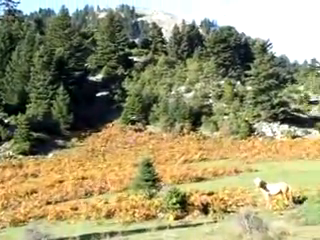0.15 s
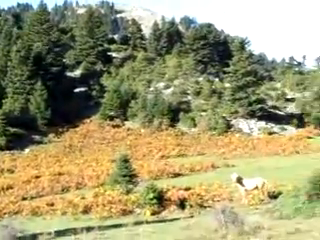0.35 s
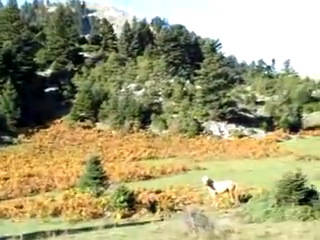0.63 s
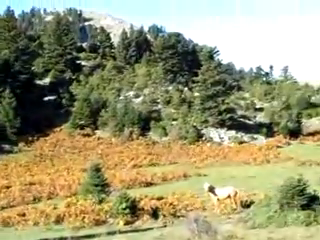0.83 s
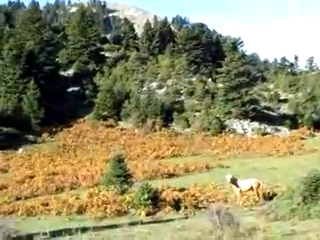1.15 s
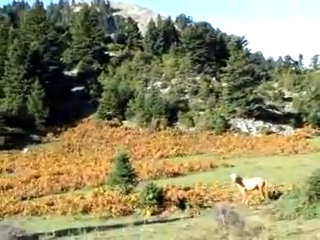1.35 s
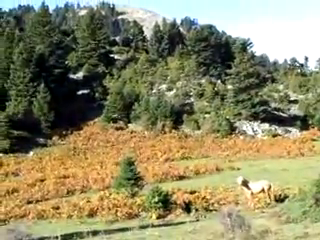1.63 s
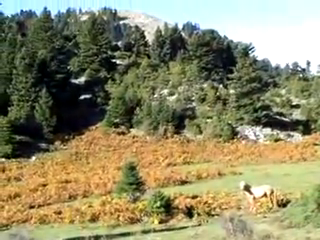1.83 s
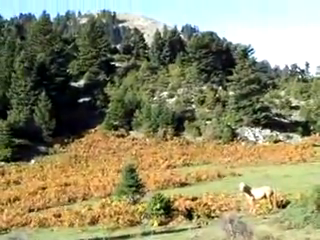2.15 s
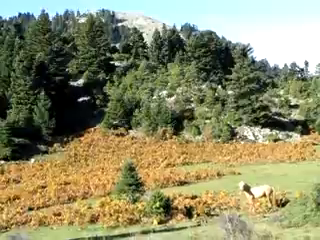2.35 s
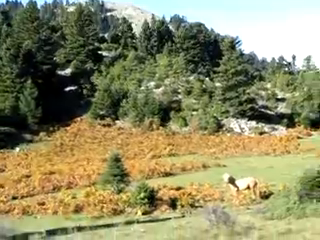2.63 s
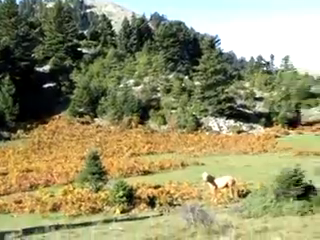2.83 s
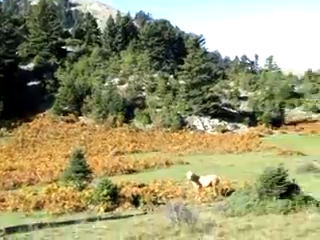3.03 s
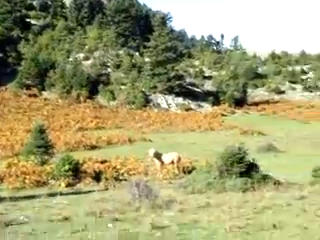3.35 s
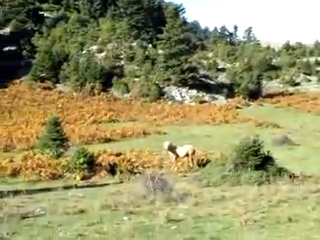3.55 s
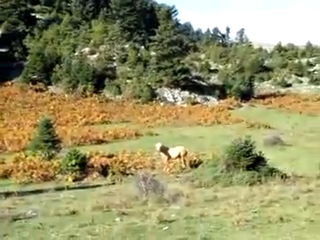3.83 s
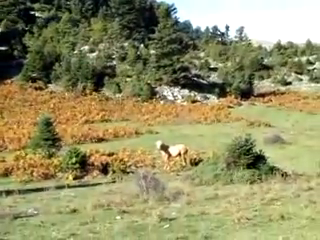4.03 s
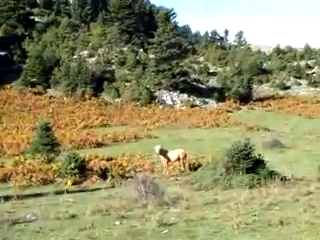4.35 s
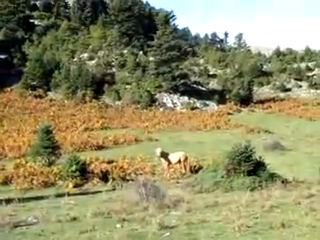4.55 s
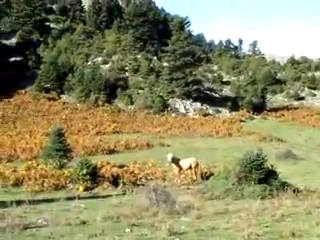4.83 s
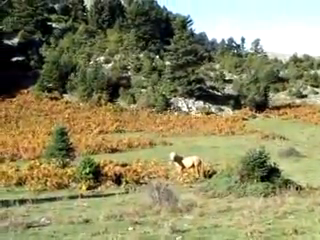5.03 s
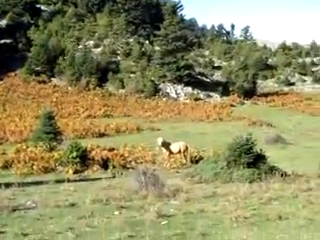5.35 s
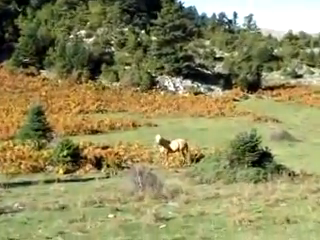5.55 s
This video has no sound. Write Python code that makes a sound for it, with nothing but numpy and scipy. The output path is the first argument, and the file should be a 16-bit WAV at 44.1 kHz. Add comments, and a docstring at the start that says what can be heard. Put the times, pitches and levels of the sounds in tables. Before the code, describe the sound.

In an open mountain pasture, a horse squeals briefly, then gives a long breaking whinny, and another call starts amid bell clanks, hoof knocks and wind.

```python
"""Horses call across a mountain pasture: a short squeal, a long whinny with repeated breaks, then a third call.
Each voice is a high whistle plus a lower fold tone, with rasp from throat resonances as it roughens.
A livestock bell clanks in damped modes, hooves knock, dry stalks snap, a small bird chirps in falling sines.
The wooded slope echoes as decaying noise; far bells ring, wind rumbles on two microphone ports, and
distant trees and air hiss as shaped noise."""
import sys
import numpy as np
from scipy import signal
from scipy.fft import rfft, irfft, next_fast_len
from scipy.io import wavfile
from scipy.ndimage import uniform_filter1d

SR = 44100
rng = np.random.default_rng(int(sys.argv[2]) if len(sys.argv) > 2 else 0)


def put_to_file(sound):
    """Save the sound as 16-bit audio at rate SR, in the file named by the first command-line argument."""
    columns = np.atleast_2d(sound).T  # one column per channel
    safe = np.clip(columns, -1, 1)
    whole_steps = np.round(safe * 32767)
    wavfile.write(sys.argv[1], SR, whole_steps.astype(np.int16))


N = 250929
T = np.arange(N) / SR
FFT_SIZE = next_fast_len(N, real=True)


def undb(db):
    """Decibels to gain."""
    return 10 ** (np.asarray(db) / 20)


def unit(x):
    """Scale to rms 1."""
    return x / np.sqrt(np.mean(x ** 2) + 1e-18)


def steady(x):
    """Divide by the running rms over 25 ms."""
    return x / np.sqrt(np.abs(uniform_filter1d(x ** 2, size=1100)) + 1e-12)


def curves(table, t=T):
    """Columns of a table, joined by straight lines in time."""
    s, *columns = np.transpose(table)
    return [np.interp(t, s, c) for c in columns]


def over_bins(points):
    """(Hz, value) points interpolated over the FFT bins on a log axis."""
    hz, value = np.transpose(points)
    bin_hz = np.arange(FFT_SIZE // 2 + 1) * SR / FFT_SIZE
    return np.interp(np.log(bin_hz + 1), np.log(hz + 1), value)


def shape(x, response):
    """Filter by a frequency response."""
    return irfft(rfft(x, FFT_SIZE) * response, FFT_SIZE)[..., :N]


def noise(colour):
    """Noise of rms 1 with a given spectrum."""
    return unit(shape(rng.standard_normal(N), undb(over_bins(colour))))


def resonate(x, hz, width_hz):
    """Two-pole resonance with gain 1 at its centre."""
    return signal.lfilter(*signal.iirpeak(hz, hz / width_hz, fs=SR), x)


def steep(x, hz, width_hz):
    """A resonance applied twice."""
    return resonate(resonate(x, hz, width_hz), hz, width_hz)


def band(hz, width_hz, t):
    """Noise in a steep resonance, rms 1."""
    return unit(steep(rng.standard_normal(len(t)), hz, width_hz))


def walk(cutoff_hz, t=T):
    """Random drift: low-passed noise, rms 1."""
    return unit(signal.lfilter(*signal.butter(2, cutoff_hz, fs=SR), rng.standard_normal(len(t))))


def cycle(hz):
    """Phase of an oscillator that follows a pitch curve."""
    return 2 * np.pi * np.cumsum(hz) / SR


def bump(s, rise_s, fall_s):
    """Gaussian hump of height 1 at time s; rise and fall are its 1/e times."""
    return np.exp(-np.minimum(((T - s) / np.where(T < s, rise_s, fall_s)) ** 2, 50))


def add(out, s, sound, pan_db=0):
    """Mix a short sound in at time s; pan is left minus right."""
    i = int(s * SR)
    out[:, i:i + len(sound)] += undb([[pan_db / 2], [-pan_db / 2]]) * sound[:N - i]


def horse(call, jitter, rough_jitter, doubling, rasp_db, fold_db, sideband_db, buzz_db, turbulence_db):
    """Whistle and lower fold tone intermodulate; as the voice breaks, the whistle scatters into rasp."""
    # throat resonances: f/Hz, width of each of two passes/Hz, relative level/dB
    throat = [(700, 490, -13.5), (1292, 410, -7.5), (1473, 78, -2), (1694, 220, -1.5), (2084, 530, -7.5)]
    nose_hz, nose_width_hz = 3194, 640
    flap_hz, flap_scatter, flap_depth_db = 85.4, 0.2, 5.5  # depth before levelling, at full roughness

    on, *controls = call
    span = (T >= np.floor(T[on][0])) & (T < np.ceil(T[on][-1]))
    t, out = T[span], np.zeros(N)
    hz, level_db, overtone_db, rough, fold_hz, strength_db = (c[span] for c in controls)
    rough, strength = np.clip(rough, 0, 1), undb(strength_db)

    stumble = .035 * rough * walk(35, t)
    high = cycle(hz * (1 + stumble + (jitter + rough_jitter * rough) * walk(178.0, t)))
    low = cycle(fold_hz * (1 + .05 * walk(110, t) / np.sqrt(1 + 6 * strength ** 2)))
    whistle_gain = np.sqrt(np.maximum(1 - 0.84 * rough, 0))
    whistle = whistle_gain * np.sin(high) * undb(2.3 * np.sqrt(rough) * walk(93, t))
    # strained folds beat strong-weak: side tones half a fold pitch from the whistle
    whistle = whistle * (1 + doubling * rough * np.sin(low / 2 + 2 * walk(40, t)))

    # folds chop the whistle: sum and difference tones in the upper throat resonance
    side_tones = np.sin(high + low) + undb(-7.5 + 4.5 * walk(30, t)) * np.sin(2 * high - low)
    chop = undb(sideband_db + 2.96 * walk(49, t)) * resonate(side_tones, hz=2360, width_hz=1100)
    fold_octave = undb(4.5) * strength ** 4 * np.sin(2 * low)  # grows when pressed hard
    folds = strength * (undb(fold_db) * strength * np.sin(low) + chop) + fold_octave

    # slack tissue flaps unevenly and lets the air through in puffs
    flap_phase = cycle(flap_hz * (1 + flap_scatter * walk(57, t)))
    flap = steady(undb(flap_depth_db * rough * np.sin(flap_phase)))
    rasp = steady(sum(undb(db) * band(f, w, t) for f, w, db in throat))

    # the nose picks out the whistle's octave, fold buzz and turbulence near its resonance
    buzz = np.sin(2 * high - low) + np.sin(high + 2 * low) + np.sin(5 * low)
    buzz = buzz + np.sin(high + 3 * low) * undb(4 * walk(25, t)) / 2
    turbulence = undb(turbulence_db) * rough * band(nose_hz, 1300, t)
    drive = np.sin(2 * high) + undb(buzz_db) * strength * buzz + turbulence
    nose = resonate(steady(steep(drive, nose_hz, nose_width_hz)), nose_hz, nose_width_hz)
    nose = 1.03 * nose * undb((3.0 + 2.0 * rough) * walk(44, t))

    voice = np.sqrt(2) * (whistle + folds) + undb(rasp_db) * rough ** 0.68 * rasp + undb(overtone_db) * nose
    sounding = uniform_filter1d(1. * on[span], size=300)  # 7 ms edges
    out[span] = voice * flap * undb(level_db) * sounding
    return out


def squealing(fold_hz):
    """Controls of a squeal: one whistle that swoops up and down over a fold tone of constant mean pitch."""
    # course: t/s, whistle f/Hz before smoothing, level/dB, nasal overtone/dB, roughness/0-1, fold strength/dB
    course = [(2.225, 1667, -51.5, 0, .15, -31), (2.243, 1628, -29, -1.5, 0.26, -19),
              (2.258, 1626, -29, -2.5, 0.03, -21), (2.272, 1673, -36, -0.5, 0.23, -22),
              (2.279, 1924, -32.5, -21, 0.03, -5), (2.298, 1955, -28.5, -21, 0, -21),
              (2.308, 1621, -34.5, 1.5, 0.32, -12), (2.322, 1595, -31, 0.5, 0.28, -7.5),
              (2.333, 1712, -41, -1, 0.32, -14.5), (2.346, 1870, -44, -4, 0.3, -9),
              (2.353, 2002, -31, -9, 0, -12), (2.368, 1692, -41.5, -11, 0.83, -11),
              (2.386, 1223, -29, -15, 0.01, -9), (2.394, 1395, -48, -7.5, 0.32, -24),
              (2.406, 1582, -34.5, -3, 0.1, -12), (2.422, 1668, -31.5, 14.5, 0, -18),
              (2.438, 1470, -28.5, -3, .1, -5), (2.448, 1300, -30, 6, .18, -9.5),
              (2.461, 1340, -43, 7, 0.2, -22)]
    hz, level_db, overtone_db, rough, strength_db = curves(course)
    on = (T > course[0][0]) & (T < course[-1][0])
    return on, uniform_filter1d(hz, size=260), level_db, overtone_db, rough, np.full(N, fold_hz), strength_db


def holding(course, scoop, fold_pitch, shimmer_db):
    """Controls of a long call: scoop up to a held note; at each catch pitch drops, voice breaks, folds sound."""
    # catches: t/s, pitch drop/share, fall/s, recovery/s, added roughness/0-1, level change/dB
    catches = [(3.214, 0.0037, 0.045, 0.099, 0.15, -9), (3.564, 0.033, 0.027, 0.035, 0.07, -1),
               (3.687, 0.11, 0.011, .07, 0.48, -13), (3.981, 0.061, 0.028, 0.026, 0.14, -2.5),
               (4.104, 0.15, 0.03, 0.041, 0.22, -2), (4.235, 0.28, 0.025, .04, 0.54, -8),
               (4.345, .13, 0.02066, 0.0357, 0.05, 1.5), (4.409, 0.0983, .012, .012, 0.31, 0.5),
               (4.457, 0.092, 0.011, 0.015, 0.1, 3), (5.59, 0.02, 0.02, 0.018, 0.3, -10)]
    scoop_s, onset_db, onset_s = .027, -26, 0.011
    break_lead_s, break_s = 0.01017, 0.015  # the break precedes the pitch minimum
    dip_s, snap_back_s = 0.012, 0.018
    fold_lead_s, fold_s, fold_lift_db = 0.013, 0.018, 8.5

    held_hz, level_db, overtone_db, rough, strength_db = curves(course)
    age = np.maximum(T - course[0][0], 0)
    hz = held_hz * (1 - scoop * np.exp(-age / scoop_s))
    level_db = level_db + onset_db * np.exp(-age / onset_s) + shimmer_db * walk(30)
    strain = 0
    for s, drop, fall_s, recovery_s, added_rough, change_db in catches:
        hz = hz * (1 - drop * bump(s, fall_s, recovery_s))
        rough = rough + added_rough * bump(s - break_lead_s, break_s, break_s)
        level_db = level_db + change_db * bump(s - break_lead_s, dip_s, snap_back_s)
        strain = strain + bump(s - fold_lead_s, fold_s, fold_s)
    on = (age > 0) & (T < course[-1][0] + .01)
    return on, hz, level_db, overtone_db, rough, curves(fold_pitch)[0], strength_db + fold_lift_db * strain


def cracks(jitter):
    """The voice flips into a higher register for an instant and tumbles back in a rough squeak."""
    # flips: t/s, length/s, level/dB, start f/Hz, end f/Hz
    flips = [(3.661, .02, -36, 3130, 2500), (3.666, 0.012, -28.5, 2400, 1760),
             (4.079, 0.027, -27.5, 2214, 1880), (4.241, .013, -21, 1740, 1600)]
    out = np.zeros((2, N))
    for s, length_s, db, start_hz, end_hz in flips:
        u = np.linspace(0, 1, int(length_s * SR))
        hz = (start_hz + (end_hz - start_hz) * u ** 2) * (1 + jitter * walk(400)[:len(u)])
        add(out, s, undb(db) * np.sin(np.pi * u) * np.sin(cycle(hz)))
    return out


def bell():
    """Dull sheet-metal bell: damped sine modes, weighted by which wall the clapper strikes."""
    # modes: f/Hz, t60/s, relative level struck on front wall/dB, on back wall/dB
    modes = [(635, .11, 0, -1), (664, .22, -8, -7), (1809, .12, -33, -12), (2385, 1.6, -29, -17),
             (2750, .2, -15, -30), (3957, .18, -26, -17), (4064, .18, -9, -25)]
    # clapper blows: t/s, level/dB, wall/0 front - 1 back
    blows = [(1.738, -29, 0.2), (1.916, -21.5, 0.059), (2.133, -29, 0.66), (2.996, -19, 1),
             (3.193, -19.5, 0.6)]
    out, t = np.zeros((2, N)), T[:SR]
    for s, db, wall in blows:
        ring = 0
        for hz, t60, front_db, back_db in modes:
            mode_db = front_db + wall * (back_db - front_db)
            ring = ring + undb(mode_db - 60 * t / t60) * np.sin(2 * np.pi * hz * t)
        add(out, s, undb(db) * ring * (1 - np.exp(-t / 0.0049)))
    return out


def ports(x):
    """Sound from the side reaches the left port first; the housing shades the right one near 3 kHz."""
    # port level difference: f/Hz, left minus right/dB
    balance = [(600, -1.5), (1100, -1), (1700, -1), (1950, -5.5), (2220, -6), (2400, 1), (2700, 3.5),
               (3300, 12.5), (4100, 10), (6000, 1.5)]
    # port phase difference: f/Hz, lead of left/rad
    lead = [(100, .1), (640, 0.31), (1250, 0.46), (1700, 0.88), (1900, 1.1), (2400, 2.66), (2820, 3.35),
            (4000, 4.8)]
    half = undb(over_bins(balance) / 2)
    left, right = np.array([half, 1 / half]) / np.sqrt((half ** 2 + half ** -2) / 2)
    return shape(x, np.array([left, right * np.exp(-1j * over_bins(lead))]))


def hooves(grit_db, turf_hz):
    """Hollow knock of two damped sines with a short crunch of soil noise, muffled by the turf."""
    # knocks: t/s, level before the turf filter/dB, f/Hz, t60/s
    knocks = [(.397, -26, 730, 0.015), (2.636, -34, 639, 0.039), (4.655, -26, 740, 0.025),
              (4.738, -22.5, 1115, 0.017), (5.316, -19, 702, 0.04), (5.341, -20, 683, 0.028),
              (5.399, -23.5, 710, 0.066), (5.4195, -10, 800, 0.017), (5.425, -16, 690, 0.018),
              (5.472, -22.5, 285.4, 0.013), (5.482, -17, 574, 0.0064), (5.484, -47, 92, 0.25)]
    out, t = np.zeros((2, N)), T[:SR // 5]
    for s, db, hz, t60 in knocks:
        overtone = undb(-7.0 - 60 * t / t60) * np.sin(2 * np.pi * 1.1 * hz * t)
        knock = np.sin(2 * np.pi * hz * t) + overtone
        soil = band(920, 560, t)
        hit = undb(db - 60 * t / t60) * (knock + undb(grit_db) * soil)
        add(out, s, hit * (1 - np.exp(-t / 0.00058)), pan_db=-4.5)
    return signal.sosfilt(signal.butter(2, [70, turf_hz], "band", fs=SR, output="sos"), out)


def snaps(t60):
    """Dry stalks crack: resonant noise that dies within milliseconds."""
    # stalks: t/s, relative level/dB, f/Hz, left minus right/dB
    stalks = [(2.128, -21, 1990, 20.5), (3.185, -11, 8000, -9.5), (4.217, -25, 8000, -1),
              (4.738, -22, 3040, -11), (4.809, -29.5, 7700, -6), (4.815, -24, 5300, -13),
              (5.316, -10.5, 2750, 5.5)]
    out, t = np.zeros((2, N)), T[:SR // 20]
    for s, db, hz, pan_db in stalks:
        crack = unit(resonate(rng.standard_normal(len(t)), hz, 0.13 * hz))
        add(out, s, undb(db - 60 * t / t60) * crack / 2, pan_db)
    return out


def bird(length_s):
    """Quick whistles: sines that fall exponentially in pitch under a half-sine envelope."""
    # chirps: t/s, level/dB, start f/Hz, end f/Hz
    chirps = [(0.123, -45.5, 3370, 2520), (.748, -47.5, 3440, 2430), (4.604, -48, 3310, 2790),
              (4.956, -48, 3310, 2370)]
    out, u = np.zeros((2, N)), np.linspace(0, 1, int(length_s * SR))
    for s, db, start_hz, end_hz in chirps:
        phase = cycle(start_hz * (end_hz / start_hz) ** u)
        add(out, s, undb(db) * np.sin(np.pi * u) * np.sin(phase))
    return out


def slope(x, t60, forest_db, dull_hz):
    """Quick scatter from the ground nearby plus a thin dull echo from the trees: decaying low-passed noise."""
    ground_db = -25
    t, out = T[:SR], []
    for channel in x:
        dull = signal.butter(4, dull_hz, fs=SR, output="sos")
        scatter = signal.sosfilt(dull, rng.standard_normal(SR))
        ground = unit(scatter * undb(-60 * t / 0.088) * (t > .003))
        forest = unit(scatter * undb(-60 * t / t60) * (1 - np.exp(-t / 0.0011)))
        echo = (undb(ground_db) * ground + undb(forest_db) * forest) / np.sqrt(SR)
        out.append(signal.fftconvolve(channel, echo)[:N])
    return np.array(out)


def far_bells():
    """Small bells further off in the herd: one damped sine each, at most 2 s long."""
    # strokes: t/s, level/dB, f/Hz, t60/s
    strokes = [(1.327, -54, 2790, 8.8), (5.039, -53.5, 4410, 1.2)]
    out, t = np.zeros((2, N)), T[:2 * SR]
    for s, db, hz, t60 in strokes:
        add(out, s, undb(db - 60 * t / t60) * np.sin(2 * np.pi * hz * t) * (1 - np.exp(-t / 0.0034)))
    return out


def wind(rumble_db, flutter_db):
    """Gusts over a light breeze rumble on each port independently; single eddies add brief damped swings."""
    # rumble spectrum: f/Hz, relative level/dB
    colour = [(12, -24), (20, 2), (43, 5), (68, 4), (103, -6.5), (221, -27), (260, -41.5), (340, -92),
              (570, -120)]
    # gusts: t/s, level before rumble_db/dB, 1/e half length/s, left minus right/dB
    gusts = [(0.446, -54, 0.045, -5), (0.954, -49, 0.12, 8.5), (1.12, -60, 0.059, 15),
             (1.42, -45, 0.35, 10), (1.925, -40, 0.17, -0.5), (2.274, -41, 0.27, 12),
             (2.644, -34.5, 0.11, 13), (3.088, -50.5, 0.32, -19.5)]
    # eddies: t/s, level/dB, f/Hz, port/0 left - 1 right
    eddies = [(0.94, -33, 67, 1), (1.324, -26, 82.5, 0), (1.953, -21, 115, 1), (2.276, -21, 59.6, 0),
              (2.464, -17.5, 79.1, 1), (2.635, -20, 65.5, 0), (2.974, -22.5, 77, 1), (3.133, -33, 75, 1)]
    force = undb(-61.5)  # breeze between gusts, before rumble_db
    for s, db, half_s, pan_db in gusts:
        force = force + undb([[db + pan_db / 2], [db - pan_db / 2]]) * bump(s, half_s, half_s)
    out = np.array([noise(colour) * port * undb(rumble_db + flutter_db * walk(33.0)) for port in force])
    for s, db, hz, port in eddies:
        cycles = (T - s) * hz
        out[int(round(port))] += undb(db) * np.sin(2 * np.pi * cycles) * np.exp(-np.abs(cycles) / 0.41)
    return out


def air():
    """Far trees and open air: shaped noise whose likeness between ports varies with frequency."""
    # spectrum: f/Hz, relative level/dB
    spectrum = [(40, -19.5), (130, -6.5), (220, -7), (400, -2.5), (520, -8.5), (720, 1.5), (900, -3),
                (1060, -0.5), (1450, -9), (3000, -11.5), (5000, -12.5), (7200, -18.5), (8400, -20),
                (10800, -32)]
    # course: t/s, level before a slow random sway/dB
    course = [(0, -48.5), (2.2, -47.5), (2.8, -45), (4.4, -45.5), (4.8, -44), (5.68, -45)]
    # f/Hz, correlation between ports
    likeness = over_bins([(150, 0.27), (600, 0.63), (1200, 0.072), (2500, 0.1), (5000, 0.068), (8000, 0.39)])
    mid = shape(noise(spectrum), np.sqrt((1 + likeness) / 2))
    side = shape(noise(spectrum), np.sqrt((1 - likeness) / 2))
    sway_db = .5 * walk(3)
    return np.array([mid + side, mid - side]) * undb(curves(course)[0] + sway_db)


def scene():
    """Three calls and the small sounds of the pasture under one hillside echo, with far bells, wind and air."""
    # long calls, before scoop and catches:
    # t/s, whistle f/Hz, level/dB, nasal overtone/dB, roughness/0-1, fold strength/dB
    whinny_course = [(3.14, 1797, -29, -14, 0.12, -17), (3.29, 1759, -25.5, -12, 0.04, -17),
                     (3.48, 1696, -24.5, -10, 0.04, -28.5), (3.53, 1705, -27, -12.5, 0.09, -16),
                     (3.66, 1673, -24, -21, 0.11, -14.5), (3.695, 1646, -17, -20, 0.01, -26.5),
                     (3.72, 1646, -27, -14, 0.1, -28.5), (3.77, 1631, -28.5, -21, 0.39, -16),
                     (3.8, 1630, -22.5, -17, 0, -23), (3.86, 1641, -23.5, -16.5, 0.07, -42),
                     (3.93, 1716, -26.5, -8.5, 0.02, -18.5), (4.03, 1745, -26.5, -13.5, 0.13, -15.5),
                     (4.11, 1745, -24, -25, 0.15, -19.5), (4.145, 1745, -23, -13, 0.17, -21.5),
                     (4.178, 1744, -24.5, -29, .08, -11), (4.2, 1720, -26, -14.5, 0.18, -18),
                     (4.3, 1603, -26, -7, 0.22, -11), (4.39, 1290, -33.5, -15, 0.53, -14),
                     (4.48, 1292, -31, -17.5, 0.37, -20), (4.57, 1275, -37, -18, 0.39, -12),
                     (4.63, 1259, -46, -13, 0.71, -18), (4.73, 1209, -44, -10, .8, -27)]
    answer_course = [(5.234, 1833, -20.5, -43, 0.1, -34), (5.268, 1837, -24, -6, 0.04, -30),
                     (5.29, 1848, -27, -16, 0.2, -12), (5.41, 1895, -27, -10.5, 0.16, -9.5),
                     (5.47, 1887, -28.5, -14.5, 0.24, -15), (5.515, 1920, -28, -8.5, 0.13, -14.5),
                     (5.55, 1936, -28.5, -13.5, 0.059, -9), (5.61, 1911, -26, -33, 0.31, -13.5),
                     (5.66, 1993, -30.5, -0.5, 0.18, -3.5), (5.688, 1975, -33.5, -16.5, 0.09, 0)]
    # mean pitch of the fold tone: t/s, f/Hz
    whinny_fold = [(3.28, 690), (3.53, 600), (4.08, 620), (4.18, 570), (4.33, 550), (4.39, 455)]
    answer_fold = [(5.3, 687.5), (5.37, 750), (5.49, 738.7), (5.57, 638.7), (5.64, 662)]

    squeal = horse(squealing(fold_hz=665.0),
                   jitter=0.004, rough_jitter=0.061, doubling=1.0, rasp_db=0.0,
                   fold_db=-5, sideband_db=2, buzz_db=1.0, turbulence_db=1.5)
    whinny = horse(holding(whinny_course, scoop=0.24, fold_pitch=whinny_fold, shimmer_db=1.18),
                   jitter=0.0027, rough_jitter=0.0403, doubling=0.78, rasp_db=0,
                   fold_db=-2.5, sideband_db=-1, buzz_db=-7.0, turbulence_db=0.5)
    answer = horse(holding(answer_course, scoop=0.36, fold_pitch=answer_fold, shimmer_db=1.04),
                   jitter=0.0026, rough_jitter=0.014, doubling=0.82, rasp_db=-6.5,
                   fold_db=0, sideband_db=-0.5, buzz_db=6.5, turbulence_db=15.5)
    near = ports(squeal + whinny + answer + cracks(jitter=0.059) + bell())
    near = near + hooves(grit_db=-8.5, turf_hz=1400) + snaps(t60=0.0044) + bird(length_s=0.037)
    echo = slope(near, t60=0.98, forest_db=-19.5, dull_hz=2070)
    return near + echo + far_bells() + wind(rumble_db=-5.5, flutter_db=3.5) + air()


def record(dry):
    """Steep elliptic low-pass that cuts the top."""
    top_hz = 10900
    return signal.sosfilt(signal.ellip(10, .2, 80, top_hz, fs=SR, output="sos"), dry)


dry = scene()
out = record(dry)
put_to_file(out)
```